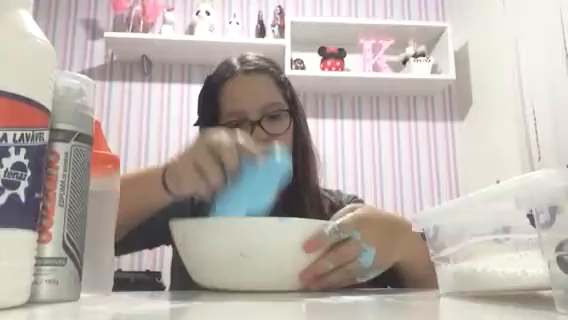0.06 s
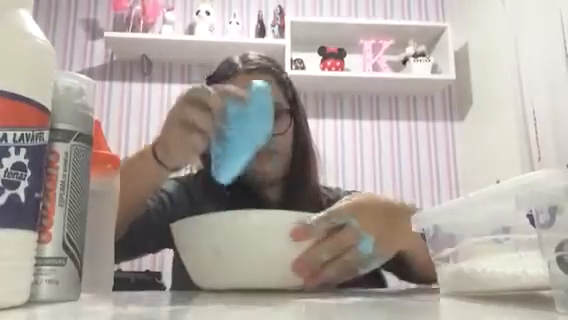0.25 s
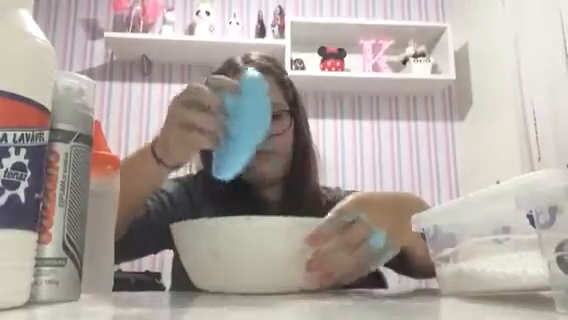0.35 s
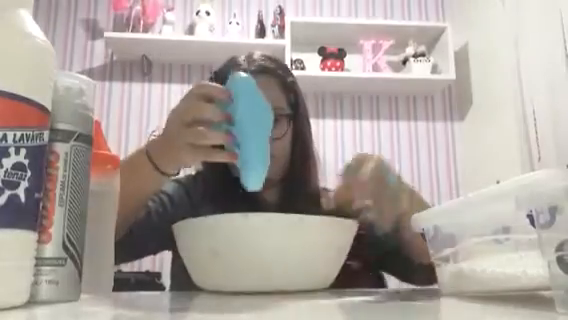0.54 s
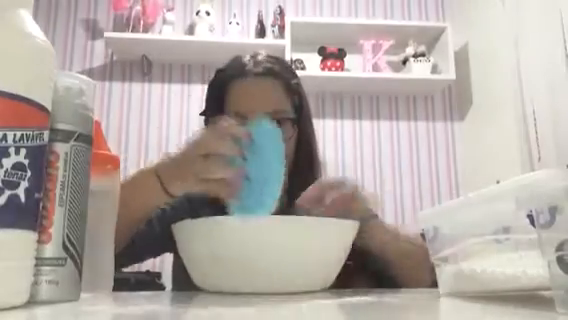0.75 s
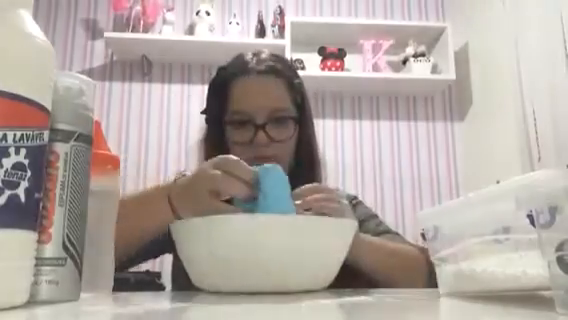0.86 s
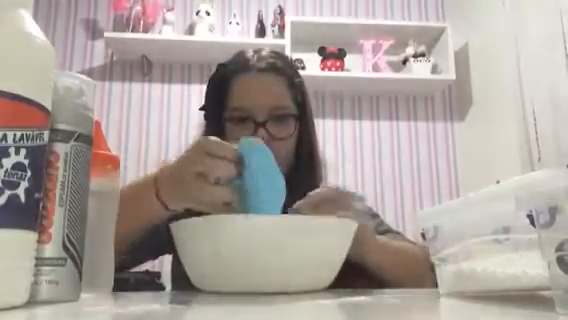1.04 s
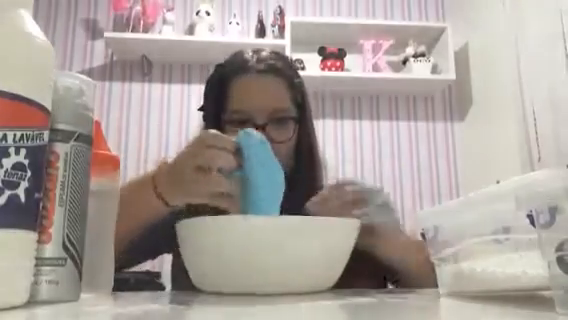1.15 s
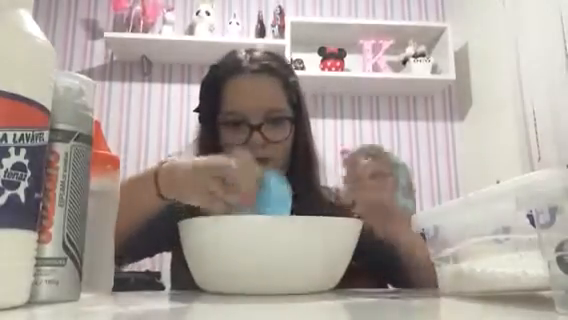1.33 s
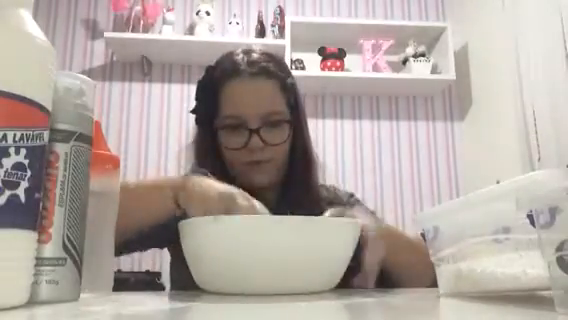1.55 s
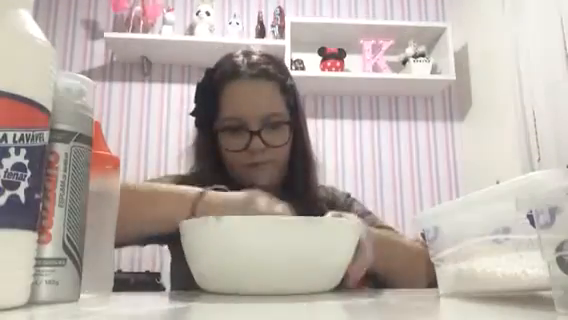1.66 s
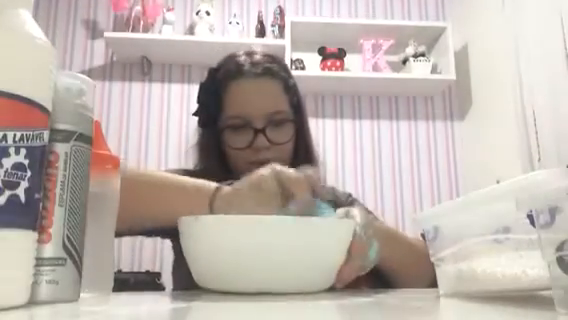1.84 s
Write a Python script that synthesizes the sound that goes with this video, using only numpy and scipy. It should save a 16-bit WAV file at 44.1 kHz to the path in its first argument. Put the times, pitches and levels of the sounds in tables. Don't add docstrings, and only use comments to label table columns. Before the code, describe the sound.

Sticky slime slapped and squeezed in a plastic bowl, wet hollow plops and dull table knocks

```python
import sys
import numpy as np
from scipy import signal
from scipy.fft import rfft, irfft
from scipy.io import wavfile
from scipy.ndimage import uniform_filter1d

SR = 44100
rng = np.random.default_rng(int(sys.argv[2]) if len(sys.argv) > 2 else 0)


def log_audio(samples):
    frames = np.atleast_2d(samples).T
    limited = np.clip(frames, -1, 1)
    pcm = np.round(limited * 32767).astype(np.int16)
    wavfile.write(sys.argv[1], SR, pcm)


def undo_db(level):
    steps = np.asarray(level, float) / 20
    return 10 ** steps


N = 83790
MAINS_HZ, OFF_CYCLE, ON_CYCLE = 60, 0.31, 0.52


def evened(x):
    return x / np.sqrt(np.mean(x ** 2) + 1e-20)


def read(points, hz):
    f, value = np.transpose(points)
    return np.interp(np.log(hz + 1), np.log(f + 1), value)


def add(mix, s, sound):
    part = mix[round(s * SR):][:len(sound)]
    part += sound[:len(part)]


def coloured(x, points):
    gain = undo_db(read(points, np.fft.rfftfreq(len(x), 1 / SR)))
    return evened(irfft(rfft(x) * gain, len(x)))


def ring(modes, rise_s, luck, detune=0):
    t = np.arange(SR // 3) / SR
    hz, db, t60_s = np.transpose(modes)[:, :, None]
    count = len(hz)
    level_luck, pitch_luck, phase_rad = luck[:count, None], luck[8:8 + count, None], luck[-count:, None]
    decay = undo_db(db + 2.5 * level_luck - 60 * t / t60_s)
    waves = np.sin(2 * np.pi * hz * (1 + detune * pitch_luck) * t + phase_rad)
    return (decay * waves).sum(0) * (1 - np.exp(-(t / rise_s) ** 2))


def hum():
    # f/Hz, density/dB
    hum_tone = [(20, 11), (60, 7), (180, -2), (900, -10), (1600, -18.5), (2300, -35), (3700, -27.5),
                (5000, -39)]
    faint_top = [(7000, -39), (11500, -48), (12400, -100)]
    return undo_db(-57.5) * coloured(rng.standard_normal(N), list(hum_tone) + faint_top)


def whine():
    whine_hz, wander_hz, whine_db, skirt_db, gap_db = 15535, 30, -63.5, -73, -18
    skirt_hz = [13850, 14000, 14700, 15300, 15520, 15800, 15920]
    skirt_levels_db = [-50, -12, -3, -2, 0, 0, -40]
    # f/Hz, gain/dB
    whine_band = [(13650, -90), (13950, 0), (15850, 0), (15950, -90)]
    phase = np.arange(N) / SR * MAINS_HZ % 1
    off = (phase > OFF_CYCLE) & (phase < ON_CYCLE + 0.04)
    gate = uniform_filter1d(np.where(off, undo_db(gap_db), 1.), size=50)
    drift = uniform_filter1d(rng.standard_normal(N), size=200)
    drift = evened(uniform_filter1d(drift, size=200))
    tone = np.sqrt(2) * np.sin(2 * np.pi * np.cumsum(whine_hz + wander_hz * drift) / SR)
    skirt = coloured(rng.standard_normal(N), list(zip(skirt_hz, skirt_levels_db)))
    return undo_db(whine_db) * coloured(gate * (tone + undo_db(skirt_db - whine_db) * skirt), whine_band)


def buzz():
    spark_s, spark_spread_db, mood_db, bed = 0.0027, 2.5, 1.8, 0.23
    # f/Hz, density/dB
    buzz_tone = [(4500, -20.5), (5600, -15.5), (7000, -1.5), (7500, -6.5), (8800, -4.5), (10100, 2.5),
                 (11300, -5.5), (12400, -44.5)]
    # f/Hz, gain/dB
    buzz_edge = [(12400, 0), (12700, -50)]
    cycles = np.arange(N) / SR * MAINS_HZ - ON_CYCLE + 1
    cycle_luck = np.clip(rng.standard_normal((3, 200)), -2, 1.5)
    main_size, late_size, length = undo_db(spark_spread_db * cycle_luck)[:, cycles.astype(int)]
    mood = undo_db(mood_db * evened(uniform_filter1d(rng.standard_normal(N), size=1800)))
    since_s = cycles % 1 / MAINS_HZ
    late = cycles % 1 - 0.5
    spark = main_size * np.exp(-(since_s / (spark_s * length)) ** 3)
    spark = spark + 0.067 * late_size * (late > 0) * np.exp(-abs(late) / MAINS_HZ / spark_s)
    envelope = uniform_filter1d(bed * length ** 0.5 + spark, size=40)
    noise = coloured(envelope * rng.standard_normal(N), buzz_tone)
    return undo_db(-68) * mood * coloured(noise, buzz_edge)


def drags():
    slips_per_s, slip_spread_db = 6000, 2.5
    # start t/s, length/s, level/dB, squeak/dB
    strokes = [(0.009, 0.071, -58, -23.5), (0.189, 0.021, -51.5, -39.5), (0.224, 0.06, -40.5, -22.5),
               (0.258, 0.084, -47.5, -36), (0.306, 0.16, -53, -21.5), (0.466, 0.042, -56, -17.5),
               (0.693, 0.0092, -46, -29), (0.704, 0.14, -66, -33), (0.891, 0.09, -60.5, -19),
               (1.131, 0.1, -48.5, -13), (1.222, 0.095, -55.5, -23), (1.266, .09, -58, -22.5),
               (0.824, 0.041, -60, -23), (1.027, 0.043, -60, -29), (1.7, 0.052, -60, -13.5),
               (1.741, .12, -60, -16.5)]
    # f/Hz, density/dB
    body_tone = [(60, -27.5), (110, -6.5), (300, 6), (620, -0.5), (900, 1), (1300, -21.5), (2500, -37),
                 (4000, -92)]
    # f/Hz, density/dB
    squeak_tone = [(700, -29), (1100, -21), (1600, 8.5), (1950, -4.5), (2250, 6), (2600, -17),
                   (3600, -34.5), (4500, -57)]
    t = np.arange(N) / SR
    hits = rng.random(N) < slips_per_s / SR
    sizes = undo_db(slip_spread_db * np.minimum(rng.exponential(1, N), 4))
    slips = hits * sizes * rng.choice([-1, 1], N)
    body, squeak = coloured(slips, body_tone), coloured(slips, squeak_tone)
    out = np.zeros(N)
    for s, length_s, db, squeak_db in strokes:
        stroke = np.sin(np.pi * np.clip((t - s) / length_s, 0, 1) ** 1.51)
        out += undo_db(db) * stroke * (body + undo_db(squeak_db) * squeak)
    return out


def table_boom(luck):
    # f/Hz, level/dB, t60/s
    table_modes = [(62, -26.5, 0.055), (88.5, -3, 0.058), (111.1, -3, 0.14), (137.4, -0.5, 0.26),
                   (160, -1, .08), (215, 0.5, 0.2)]
    return ring(table_modes, 0.005, luck)


def bowl_clack(luck):
    # f/Hz, level/dB, t60/s
    bowl_modes = [(411, -2, 0.13), (514, -10, 0.019), (516.7, -5.5, 0.1), (600, -6, 0.14),
                  (700, -6.5, 0.012), (866, -10, 0.066), (887, -2, 0.043), (1102, -4.5, 0.041),
                  (1136, -18, 0.056), (1049, -29, 0.23), (1470, -24, 0.029), (1760, -33.5, 0.0033),
                  (1959, -23, 0.042), (1548, -24, 0.18)]
    # f/Hz, density/dB
    crack_tone = [(300, 7.5), (800, 6.5), (1500, -7), (2500, -24.5), (4200, -43), (5200, -68)]
    clack = ring(bowl_modes, 0.0015, luck, detune=0.01)
    age = np.arange(4096) / SR / 0.0033
    crack = coloured(rng.standard_normal(4096), crack_tone) * age * np.exp(1 - age)
    add(clack, 0, undo_db(-2) * crack)
    return clack


def slime_plop(hz, t60_s, rise_s):
    t60_s = t60_s * min(270 / hz, 1) ** 0.39
    return ring([(hz, 7, t60_s)], rise_s, np.zeros(32))


def knocks():
    # t/s, peak level/dB, plop f/Hz, clack/dB, boom/dB
    slaps = [(.221, -16, 894, -4, -31.5), (0.2224, -10, 247.2, -10, -20.5), (.242, -17.5, 460, -14, -23.5),
             (.254, -30.5, 526, -8.5, -15.5), (0.282, -39.5, 215, -21, -17), (0.295, -31, 226, -10, -32),
             (0.318, -36.5, 198, -10.5, -22), (.362, -47.5, 224, -2.5, -20), (.439, -32, 268, -15, -7),
             (0.4722, -44.5, 880, -7.5, -19), (.4735, -31, 308, -22.5, -11), (.700, -23.5, 283, -8, -10),
             (0.7241, -31, 278, -8.5, -16), (.8285, -40.5, 597, -8, -14), (.913, -39.5, 280, -37, -2.5),
             (.947, -43.5, 192, -10, -9), (1.052, -34.5, 303, -14.5, -11.5), (1.159, -44.5, 600, -12, -18),
             (1.222, -29.5, 607, -10, -5.5), (1.262, -26.5, 292, -23, -14), (1.7252, -39.5, 280, -14, -22),
             (.7005, -28.5, 700, -11.5, -16.5), (1.031, -48, 570, -24, -13),
             (1.2345, -24.5, 288.6, -13.5, -15)]
    # t/s, peak level/dB, plop f/Hz, clack/dB, boom/dB
    pushes = [(.223, -16, 533, -14, -19.5), (0.208, -30, 350, -8, -24.5), (0.451, -46, 223, -17, 1),
              (.492, -41, 370, -22, -9), (0.52, -42.5, 146, -18.5, -32), (0.702, -35.5, 215, -25, -7.5),
              (.8265, -25, 281.5, -32, -16.5), (0.841, -44, 317, -9, -26), (0.953, -47, 153, -25, -2.5),
              (1.025, -20.5, 281.7, -25.5, -17), (1.174, -40.5, 289, -32, -5.5),
              (1.201, -31.5, 290, -20, -14), (1.219, -19, 253, -22, -14), (1.244, -30.5, 378, -7, -12),
              (1.296, -39, 231, -29, -18), (1.323, -46.5, 411, -21, -15), (1.661, -36.5, 140, -46, -15),
              (1.717, -40.5, 150, -13.5, -15), (1.75, -49, 160, -16, -17), (1.843, -49, 230, -13.5, -14),
              (1.874, -53, 206, -15, -30), (0.929, -35, 65, -25, -17.5), (1.276, -38, 62, -20, -31),
              (0.073, -50.5, 274, -17, -10), (.712, -28.5, 205, -20, -21), (0.736, -37.5, 200, -26, -29),
              (1.225, -27, 206.7, -25, -25), (1.125, -48.5, 215, -22, -12), (0.245, -32, 171.5, -24, -15)]
    # t/s, peak level/dB, plop f/Hz, clack/dB, boom/dB
    small_knocks = [(.234, -35, 201, -18.5, -10), (.265, -35.5, 330, -9, -20), (.745, -42.5, 320, -15, -7),
                    (.757, -42.5, 440, -22, -11), (.79, -50.5, 256, -26, -15), (.846, -37.5, 341, -19.5, -14),
                    (1.06, -44, 340, -23, -19), (1.1, -49, 226, -16, -6.5), (1.175, -43, 617, -9.5, -27),
                    (1.195, -44, 600, -21, -20), (1.246, -34, 385, -5, -19), (1.272, -47, 220, -2, -4),
                    (1.305, -47.5, 230, -7, -18), (1.734, -50.5, 413, -9.5, -18), (1.725, -44, 165, -25, -12),
                    (.505, -49.5, 293, -9.5, -13), (.535, -53, 262, -9.5, -15)]
    out = np.zeros(N)
    for blows, t60_s, rise_s in [(slaps, 0.04, 0.0018), (pushes, 0.07, 0.009), (small_knocks, 0.04, 0.0018)]:
        for s, db, hz, clack_db, boom_db in blows:
            luck = rng.standard_normal(32)
            blow = slime_plop(hz, t60_s, rise_s)
            blow = blow + undo_db(clack_db) * bowl_clack(luck)
            blow = blow + undo_db(boom_db) * table_boom(luck[::-1])
            add(out, s, undo_db(db) * blow)
    return out


def room(x):
    # f/Hz, t60/s
    room_t60 = [(100, 0.37), (300, 0.16), (1000, 0.23), (2500, 0.37), (5000, 0.6)]
    size = SR // 2
    echoes = rng.standard_normal(size) * (rng.random(size) < 0.05) * (np.arange(size) > 350)
    hz, t, z = signal.stft(echoes, SR, nperseg=512)
    hz = hz[:, None]
    decay = undo_db(-60 * t / read(room_t60, hz))
    tilt = 1 + (hz / 2600) ** 2
    tail = signal.istft(z * decay / tilt, SR, nperseg=512)[1]
    return undo_db(-20) * signal.fftconvolve(x, tail / np.linalg.norm(tail))[:N]


def scene():
    soft_hz = 4600
    low_pass = signal.butter(6, soft_hz, fs=SR, output="sos")
    hands = signal.sosfilt(low_pass, knocks() + drags())
    return (hands + room(hands) + hum() + whine() + buzz())[None]


def roll_off(x):
    return signal.sosfilt(signal.butter(12, 15930, fs=SR, output="sos"), x)


def record(dry):
    mic_low_hz = 93
    mix = signal.sosfilt(signal.butter(2, mic_low_hz, "high", fs=SR, output="sos"), dry)
    return roll_off(mix)


dry = scene()
out = record(dry)
log_audio(out)
```